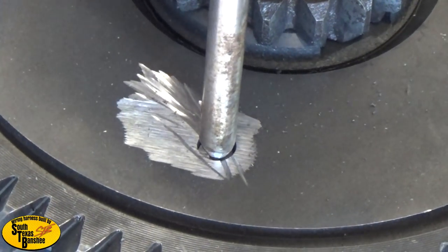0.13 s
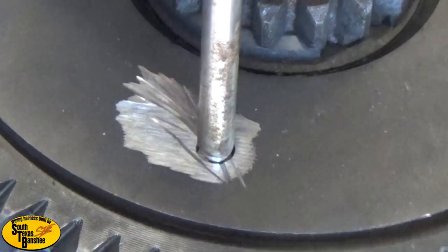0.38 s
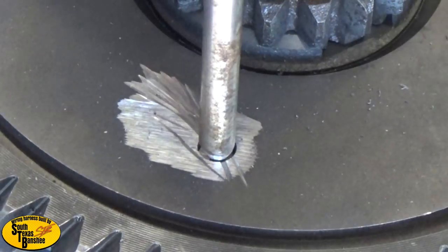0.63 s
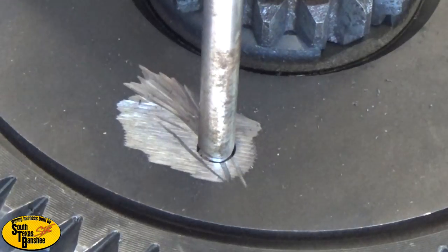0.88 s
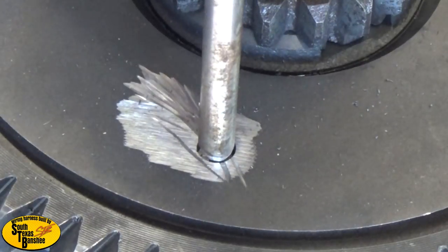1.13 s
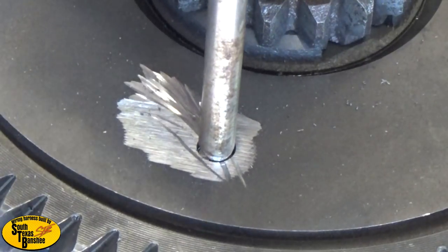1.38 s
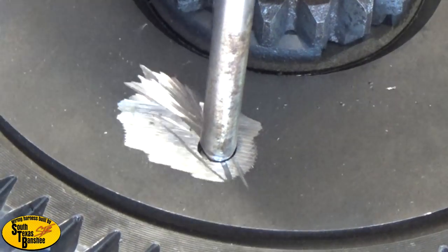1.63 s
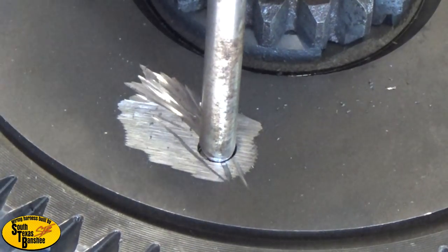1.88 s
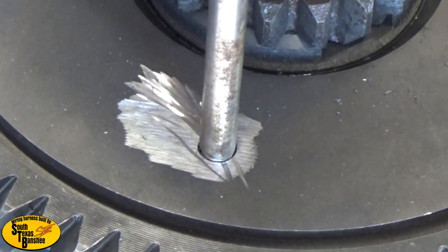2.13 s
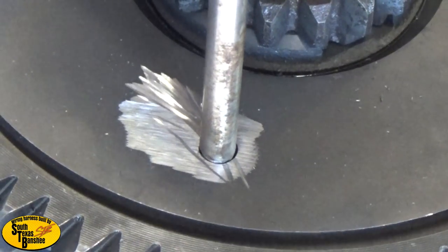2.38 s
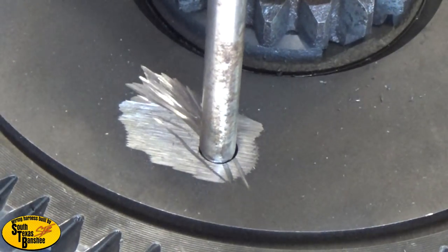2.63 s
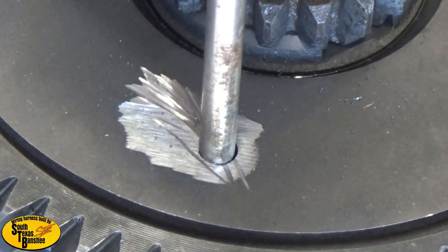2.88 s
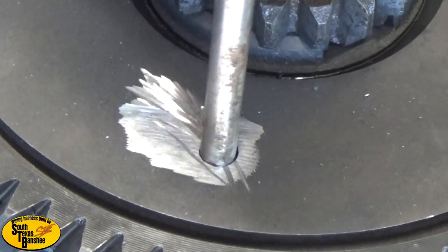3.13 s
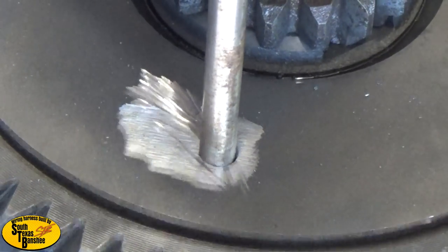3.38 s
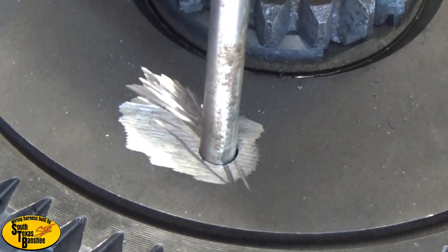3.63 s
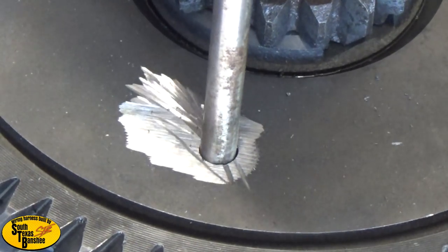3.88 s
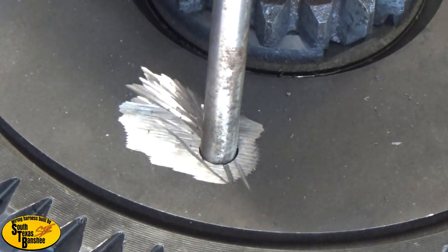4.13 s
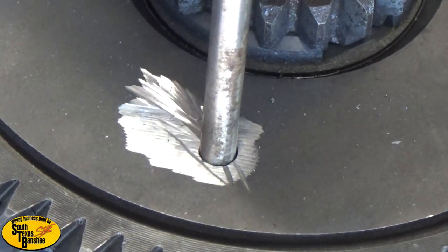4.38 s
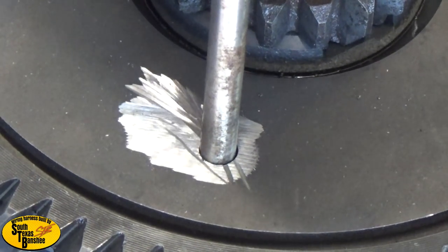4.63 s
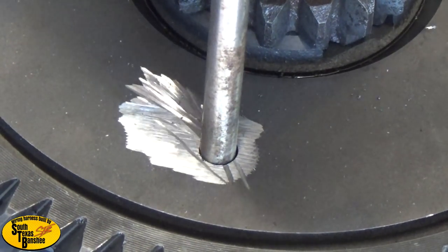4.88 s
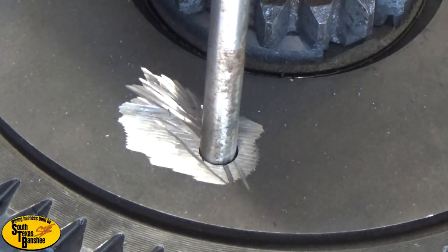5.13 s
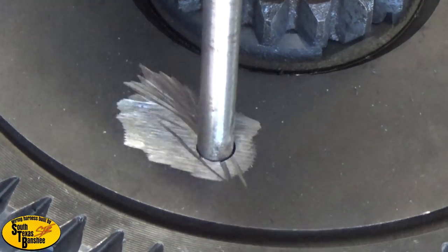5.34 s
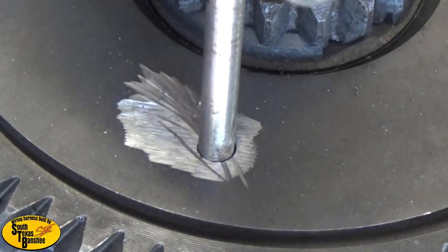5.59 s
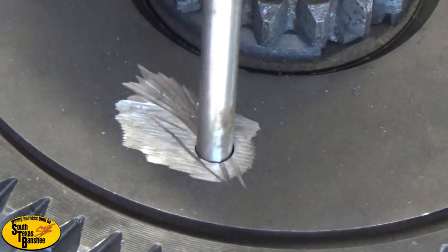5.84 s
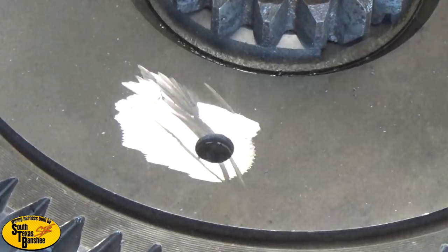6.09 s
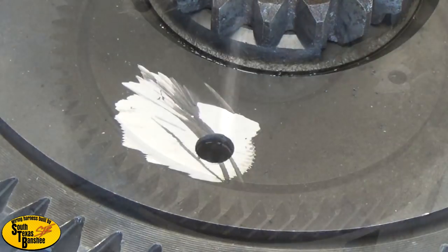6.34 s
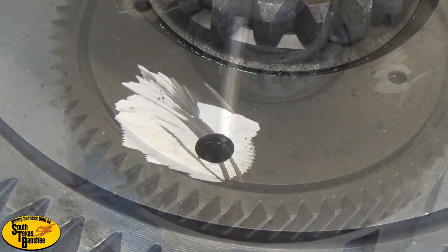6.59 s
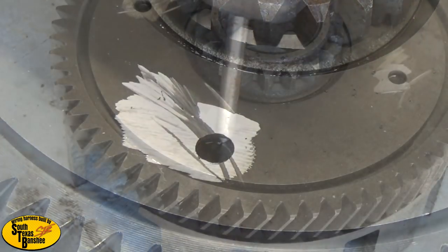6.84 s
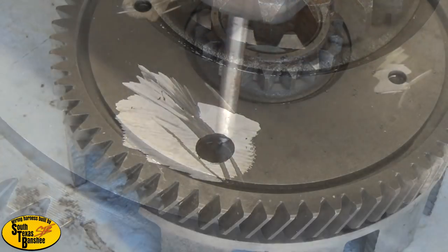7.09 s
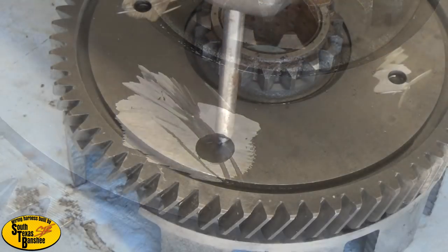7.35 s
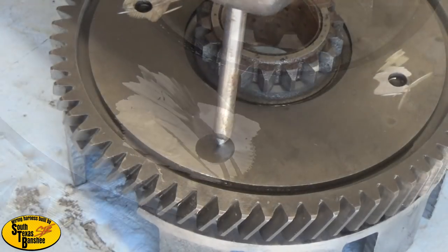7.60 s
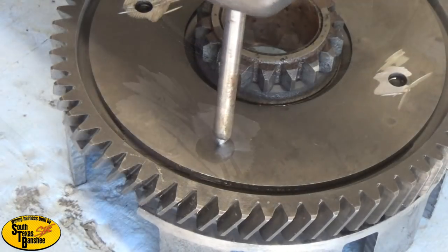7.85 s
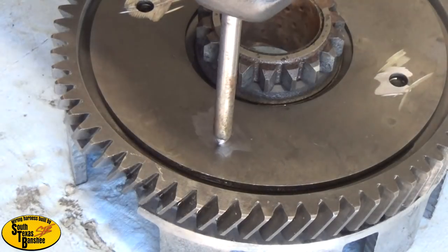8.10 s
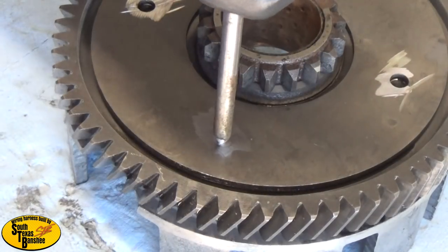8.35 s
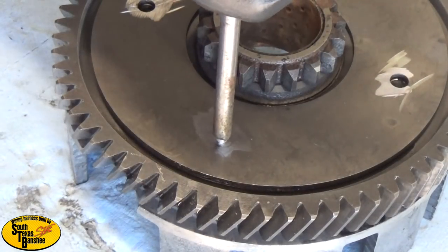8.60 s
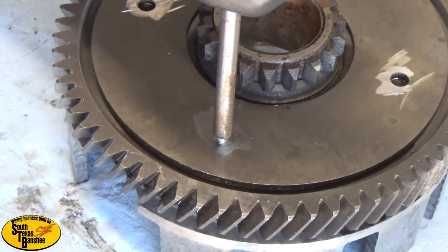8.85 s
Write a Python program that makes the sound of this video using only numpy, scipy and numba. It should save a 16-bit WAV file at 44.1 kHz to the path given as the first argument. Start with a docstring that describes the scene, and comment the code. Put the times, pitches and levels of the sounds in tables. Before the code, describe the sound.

A hammer strikes a steel punch in steady loud blows, the punch scrapes and clinks free, then after a fade harder, more ringing blows follow.

```python
"""Hammering a punch on a gear

A hammer drives a steel punch into a gear on a workshop bench; faint shop noise lies beneath.
Each blow is a short push that swings bench and room, plus a burst of noise and ringing steel for the crack.
Loose parts knock as decaying tones; the lifted punch scrapes as filtered noise and clinks as decaying tones,
among a light hammer touch and two ticks. Something is set down with a dull thud, made like a very soft blow.
A limiter holds the loud tails flat. The sound fades to silence and returns with harder blows and one tiny gap.
"""
import sys
import numpy as np
from scipy import signal
from scipy.fft import rfft, irfft, next_fast_len
from scipy.io import wavfile
from numba import njit

SR = 44100
rng = np.random.default_rng(int(sys.argv[2]) if len(sys.argv) > 2 else 0)


def generate_wav(signal):
    """Clip the signal to [-1, 1] and save it as 16-bit WAV at the path in sys.argv[1]."""
    frames = np.transpose(np.atleast_2d(signal))
    scaled = np.clip(frames, -1, 1) * 32767
    pcm = np.round(scaled).astype(np.int16)
    wavfile.write(sys.argv[1], SR, pcm)


def attenuation_scalar(level_db):
    """Turn a level in dB into a linear amplitude multiplier (20 dB per decade)."""
    decades = np.asarray(level_db, float) / 20
    return 10 ** decades


N = 396018  # length in samples
SIDES = np.array([[1], [-1]])  # a side signal is added on the left and subtracted on the right

# shop noise: (frequency [Hz], relative level [dB])
AIR_COLOUR = [(18, -25), (30, -6.5), (70, 2.5), (245, -2.5), (384, 3), (512, -3), (2010, -11), (2540, -8.5),
              (4910, -22), (7270, -28.5), (16000, -44)]
# stereo width: (frequency [Hz], side minus middle [dB])
STEREO_WIDTH = [(60, -11), (110, -15.5), (200, -17), (380, -10.5), (700, -8), (1290, -5), (2380, -9),
                (4400, -6.5), (8120, -11), (15000, -21.5)]
# colour of cracks, scrapes and hiss: (frequency [Hz], relative level [dB])
CRACK_COLOUR = [(300, -19), (1500, -1.5), (4000, 3.5), (9000, -1.5), (12000, -4), (16000, -27.5)]
# colour of the room's echo: (frequency [Hz], relative level [dB])
ROOM_COLOUR = [(18, -61), (30, -32.5), (118, -20.5), (229, -10.5), (291, -11.5), (399, -10), (547, -9.5),
               (676, -5), (1270, -7), (1570, -8), (5000, -4), (10200, -7), (11200, -18), (15200, -38.5),
               (16500, -75.5)]
# how long the room takes to fall 60 dB: (frequency [Hz], time [s])
ROOM_DECAY = [(40, 0.65), (160, 0.54), (420, 0.49), (1100, 0.41), (3000, 0.43), (8000, 0.28), (16000, 0.22)]
# how slowly the room's echo builds up: (frequency [Hz], time constant [s])
ROOM_BUILD_UP = [(100, 0.01), (400, 0.016), (800, 0.011), (2000, 0.0037), (8000, 0.0038)]
# hammer blows, and at 6.909 s the dull thud of something set down:
# (time [s], thump strength [dB], hardness = crack over thump [dB])
BLOWS_AND_THUD = [(0.0225, -2.5, 2.5), (.449, 0.5, 0.8), (.858, 0.5, 0.5), (1.243, -0.25, 1.5),
                  (1.6222, -1.5, 2.5), (2.0002, -1.5, 3), (2.3773, -1.5, 4), (2.740, -2.5, 3.5),
                  (3.101, -2, 3), (3.472, -3.5, 2), (3.843, -4.5, 1.5), (4.248, -4, -0.7),
                  (4.6341, -4.5, -1), (5.0083, -4, -1), (5.371, -6.5, 2.5), (6.909, -4.5, -26.5),
                  (7.233, -4.4, -5), (7.630, 5, 4), (7.993, 14, 6.5), (8.409, 6.5, 5.5), (8.782, 4.5, 6)]
# ringing of the gear under a blow: (frequency [Hz], relative level [dB], time to fall 60 dB [s])
GEAR_MODES = [(2249, 1.5, 0.12), (3084, 1, 0.022), (6490, 2, .13), (7430, -10, 0.059), (10000, -9, 0.087),
              (9660, -8.5, 0.13), (12370, -5, .06), (1715, -6, .08)]
# ringing of bench and gear body: (frequency [Hz], relative level [dB], time to fall 60 dB if left free [s])
BENCH_MODES = [(131.1, -27.5, 0.21), (223.6, -35.5, .4), (343.5, -29.5, 0.27), (412.2, -26, 0.25),
               (458.3, -32.5, 0.23), (495.6, -32.5, 0.23), (587, -32.5, 0.31), (662.9, -33, 0.44),
               (737.6, -35, 0.43), (780, -36.5, 0.58), (871, -37, 0.33), (992, -37, 0.41),
               (1060, -37, 0.77), (1159, -35, 0.57), (1280, -35, 0.51), (1389, -36, 0.3)]
# knocks of loose parts on the bench: (time [s], level of the main tone [dB], pitch [Hz])
LOOSE_KNOCKS = [(2.145, -17, 708), (3.36, -19, 706), (3.416, -25, 656), (3.748, -25.5, 800),
                (3.822, -16, 970), (5.845, -31.5, 1286), (6.593, -41, 210)]
# scrapes of the punch, with a light hammer touch at 3.819 s and short ticks at 6.944 and 6.993 s:
# (time [s], noise level [dB], contact [s], dull above [Hz])
SCRAPES_AND_TICKS = [(3.819, -36, 0.014, 12000), (5.71, -47, .071, 9000), (5.827, -47.5, 0.034, 9000),
                     (5.915, -53, 0.053, 6000), (5.955, -37, .035, 7000), (5.975, -40.5, 0.055, 6000),
                     (6.073, -53, 0.0078, 7000), (6.1, -51, .4, 3480), (6.255, -52, .032, 8950),
                     (6.448, -49, 0.014, 10000), (6.671, -37, 0.0065, 10000), (6.944, -29, .0047, 14000),
                     (6.993, -34, .0048, 12100)]
# the loose punch tapping the gear: (time [s], ring level [dB], contact [s])
PUNCH_CLINKS = [(6.018, -23.5, .013), (6.031, -23, .012), (6.59, -19, 0.0054), (6.596, -17.5, 0.019)]
# ringing of the loosely held punch: (frequency [Hz], relative level [dB], time to fall 60 dB [s])
PUNCH_MODES = [(1550, -26, .12), (2595, -11, .14), (4080, -16, .07), (4533, -7, .08), (4582, -7, .07),
               (8050, -1, .055), (11140, -1, .045), (13300, -22, .03)]


def along(table, hz):
    """Reads a (frequency, value) table on a log-frequency axis."""
    f, v = np.transpose(table)
    return np.interp(np.log(np.maximum(hz, 1)), np.log(f), v)


def colour(x, table):
    """Makes each frequency louder or softer by a (frequency [Hz], level [dB]) table."""
    hz = np.fft.rfftfreq(x.shape[-1], 1 / SR)
    return irfft(rfft(x) * attenuation_scalar(along(table, hz)), x.shape[-1])


def unit(x):
    """Scales a sound to a total energy of 1."""
    return x / np.sqrt(np.sum(x ** 2))


def fade(t, t60):
    """Dies away evenly, by 60 dB in t60 seconds."""
    return np.exp(-np.log(1000) * t / t60)


def even(noise, shape):
    """A noise burst of that power shape in time, with every frequency about equally strong."""
    for _ in range(8):
        spectrum = rfft(noise * shape)
        noise = irfft(spectrum / abs(spectrum), len(shape))
    return noise * np.sqrt(shape)


def rings(modes, scatter_db, size=SR // 4):
    """Struck metal as a sum of decaying tones, each with random phase and slightly random strength."""
    hz, db, t60 = np.transpose(modes)[:, :, None]
    t = np.arange(size) / SR
    chance = rng.standard_normal((2, len(modes), 1))
    strength = attenuation_scalar(db + scatter_db * chance[0])
    tones = np.sin(2 * np.pi * hz * t + 3 * chance[1])
    return np.sum(strength * tones * fade(t, np.maximum(t60, .004)), axis=0)


def add(out, s, x):
    """Mixes x into out, starting at s seconds."""
    i = int(s * SR)
    out[..., i:i + x.shape[-1]] += x[..., :N - i]


def spread(x, answer):
    """Sends a mono sound through a stereo answer: every sample starts its own copy of that answer."""
    return signal.fftconvolve(x[None], answer, axes=1)[:, :N]


def shop_air():
    """Distant noise whose level wanders slowly at random, and a thin bright hiss that grows."""
    mid, side = colour(rng.standard_normal((2, next_fast_len(N))), AIR_COLOUR)
    knots = np.arange(0, N, 8000)
    swell_db = 1.2 * np.interp(np.arange(N), knots, rng.standard_normal(len(knots)))
    stereo = (mid + colour(side, STEREO_WIDTH) * SIDES)[:, :N]
    hiss_db = np.interp(np.arange(N) / SR, (5.8, 6.87), (-69, -53))  # (times [s]), (levels before colouring)
    hiss = attenuation_scalar(hiss_db) * colour(rng.standard_normal(len(mid)), CRACK_COLOUR)[:N]
    return attenuation_scalar(-56.5 + swell_db) * stereo / np.std(mid) + hiss


def room():
    """The shop's answer to a click: half-octave noise bands that build up, then die at their own rates."""
    t = np.arange(SR) / SR
    hz = np.fft.rfftfreq(SR, 1 / SR)
    noise = rfft(rng.standard_normal((2, SR)))
    answer = 0
    for centre in 30 * 2 ** np.arange(0, 9.5, .5):
        share = np.clip(1 - 2 * abs(np.log2(np.maximum(hz, 1) / centre)), 0, 1)  # triangular band
        t60 = along(ROOM_DECAY, centre)
        decay = fade(t, t60) + attenuation_scalar(-43) * fade(t, 1.3 * t60)  # far corners linger
        shape = (1 - np.exp(-t / along(ROOM_BUILD_UP, centre))) * decay
        bands = irfft(noise * share, SR) * shape
        energy = np.sum(bands ** 2, axis=1, keepdims=True)
        bands *= np.sqrt(centre * np.sum(shape ** 2) / energy)  # even energy per Hz
        mid, side = bands * attenuation_scalar(along(ROOM_COLOUR, centre))
        answer = answer + mid + attenuation_scalar(along(STEREO_WIDTH, centre)) * side * SIDES
    return unit(answer)


def bench():
    """The heavy bench swings in slowly and rings, until the gear that jumped settles and chokes it."""
    t = np.arange(SR // 2) / SR
    free = 1 - .85 / (1 + np.exp((.1 - t) / 0.0028))  # choked around 0.1 s after the blow
    swing = 1 - np.exp(-t / 0.0034)
    mid, side = (unit(free * swing * rings(BENCH_MODES, scatter_db=0.06, size=SR // 2)) for _ in range(2))
    return mid + attenuation_scalar(-8) * side * SIDES


def blows_and_thud(walls):
    """A push swings bench and room, with a fresh crack of steel on steel; the thud is nearly all push."""
    push, clack, near = np.zeros((3, N))  # into the bench, into the air of the room, heard directly
    t = np.arange(SR // 10) / SR
    rise = 1 - np.exp(-t / 0.0012)
    for s, thump_db, hardness_db in BLOWS_AND_THUD:
        crack_db = thump_db + hardness_db
        # the punch stands on a loose rivet, from 7.1 s on solid steel, where the gear rings more
        ring_db = crack_db + (-15.5 if s < 7.1 else -9.5)
        softness_db = min(hardness_db, 0)  # a softer contact pushes longer and cracks duller
        contact_hz = 1500 * attenuation_scalar(0.26 * softness_db)
        top_hz = 18000 * attenuation_scalar(2.2 * softness_db)
        dull = [(top_hz, 0), (3 * top_hz, -25)]
        add(push, s, attenuation_scalar(thump_db) * unit(t * np.exp(-t * 2 * np.pi * contact_hz)))

        grit = rng.standard_normal((2, len(t)))
        burst = colour(even(grit[0], fade(t, .2)), dull)[:SR // 20]
        add(clack, s, attenuation_scalar(crack_db) * unit(np.diff(burst)))  # the difference brightens it
        crack = colour(colour(grit[1], dull), CRACK_COLOUR) * fade(t, 0.054) * rise
        add(near, s, attenuation_scalar(crack_db + 4.0) * crack)

        ring = attenuation_scalar(ring_db) * colour(rings(GEAR_MODES, scatter_db=2.5), dull)[:SR // 5]
        add(near, s + 0.00072, ring)
        add(clack, s, attenuation_scalar(-21) * ring[:len(t)] * fade(t, .02))  # the room hears mostly the first clang
    below = attenuation_scalar(30.5) * room()
    add(below, 0, attenuation_scalar(16.0) * bench())
    return near + spread(push, below) + attenuation_scalar(27.5) * spread(clack, walls)


def loose_parts():
    """Loose parts knock the bench: a tone and a weaker one 2.9 times higher, both dying quickly."""
    out = np.zeros(N)
    t = np.arange(SR // 10) / SR
    for s, level_db, hz in LOOSE_KNOCKS:
        knock = np.sin(2 * np.pi * hz * t) + 0.34 * np.sin(2 * np.pi * 2.9 * hz * t)
        add(out, s, attenuation_scalar(level_db) * knock * fade(t, 7 / hz))
    return out


def light_touches():
    """Scrapes, ticks and clinks: gritty noise under swelling pressure, with a ring that clinks have most of."""
    out = np.zeros(N)
    choked = [(hz, db, t60 / 8) for hz, db, t60 in PUNCH_MODES]  # pressed on the gear it hardly rings
    # all kinds of touch: (time, ring level, noise level, contact, dull above)
    touches = [(s, db - 16.5, db, contact_s, hz) for s, db, contact_s, hz in SCRAPES_AND_TICKS]
    touches += [(s, db, db - 6, contact_s, 9000) for s, db, contact_s in PUNCH_CLINKS]
    for s, ring_db, noise_db, contact_s, top_hz in touches:
        pressure = np.hanning(int(contact_s * SR))
        grit = colour(rng.standard_normal(SR // 2), [(top_hz, 0), (2 * top_hz, -20)])
        rub = colour(grit, CRACK_COLOUR)[:len(pressure)] * pressure
        add(out, s, attenuation_scalar(noise_db) * rub)
        pressed_ring = rings(choked, scatter_db=3.0, size=SR // 20)
        stirred = signal.fftconvolve(grit[:len(pressure)] * pressure, pressed_ring)
        add(out, s, attenuation_scalar(noise_db - 26.5) * stirred)
        ring = rings(PUNCH_MODES, scatter_db=1.5)
        rise = 1 - np.exp(-np.arange(len(ring)) / SR / 0.00087)
        add(out, s + contact_s / 2, attenuation_scalar(ring_db) * ring * rise)
    return out


def scene():
    """Bright sounds reach the walls through the air, the thump through the bench; shop noise is added."""
    walls = room()
    small = loose_parts() + light_touches()
    return shop_air() + blows_and_thud(walls) + small + attenuation_scalar(-10.5) * spread(small, walls)


@njit
def follow(x, attack, release):
    """Follows a level, moving a fixed share of the way per sample, one share up and another down."""
    e, out = 1e-6, np.empty(len(x))
    for i in range(len(x)):
        e += (x[i] - e) * (attack if x[i] > e else release)
        out[i] = e
    return out


def limiter(x):
    """Turns loud sound down to a nearly flat level; it reacts late, so each attack clips softly."""
    level = follow(abs(x).max(axis=0), 1 / (0.0027 * SR), 1 / (0.012 * SR))  # rise and fall times [s]
    held = x * np.minimum(1, attenuation_scalar(-7.5) / level) ** 0.93
    return 0.78 * np.tanh(held / 0.87)


def fades_and_gap():
    """The level over time: a fade to silence, a fade back in, and one very short silent gap."""
    t = np.arange(N) / SR
    fade_out_s, silent_s, full_s = 6.34, 7.083, 7.99
    falling = np.clip((silent_s - t) / (silent_s - fade_out_s), 0, 1) ** 1.315
    rising = np.clip((t - silent_s) / (full_s - silent_s), 0, 1) ** 1.24
    gap_start_s, gap_end_s, edge_s = 8.122, 8.1415, .002
    gap = np.clip(np.maximum(gap_start_s - t, t - gap_end_s) / edge_s, 0, 1)
    return np.where(t < silent_s, falling, rising) * gap


def top_cut(x):
    """Nothing passes above the cut-off."""
    return signal.sosfilt(signal.butter(12, 16870, fs=SR, output="sos"), x)


def record(dry):
    """Small microphones lose the deep bass; then come limiter, treble cut, fades and gap."""
    thin = signal.sosfilt(signal.butter(2, 50, "highpass", fs=SR, output="sos"), dry)
    held = limiter(thin)
    cut = signal.sosfilt(signal.ellip(6, .3, 40, 16100, fs=SR, output="sos"), held)  # low-pass [Hz]
    mix = cut * attenuation_scalar(-2) * fades_and_gap()
    return top_cut(mix)


dry = scene()
out = record(dry)
generate_wav(out)
```